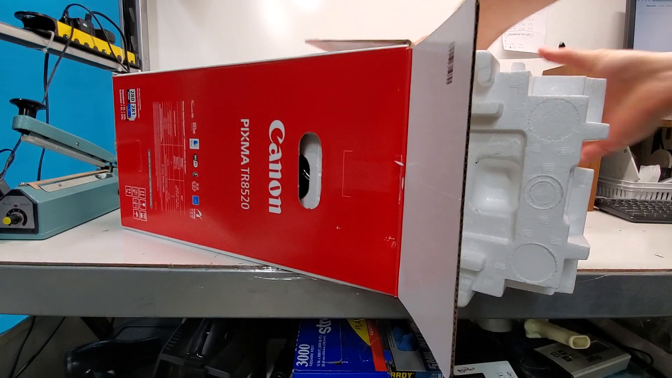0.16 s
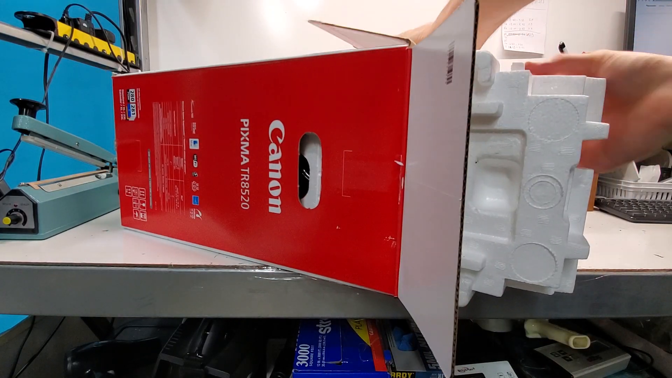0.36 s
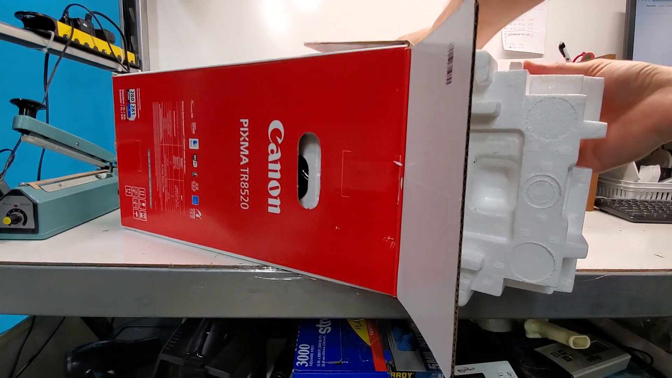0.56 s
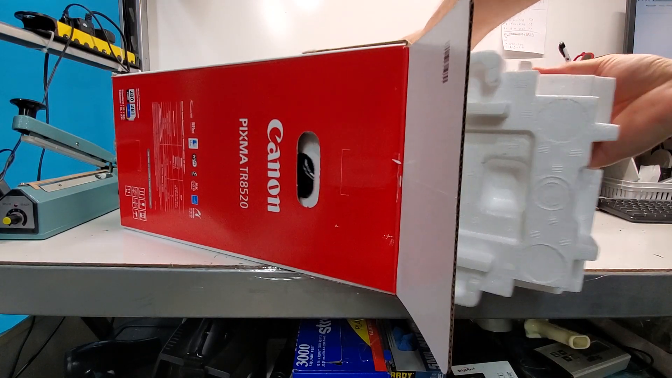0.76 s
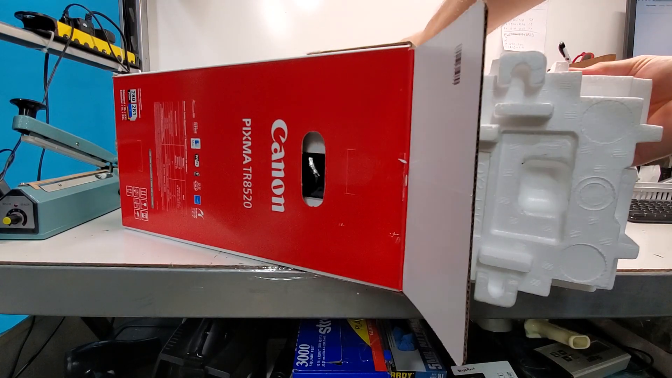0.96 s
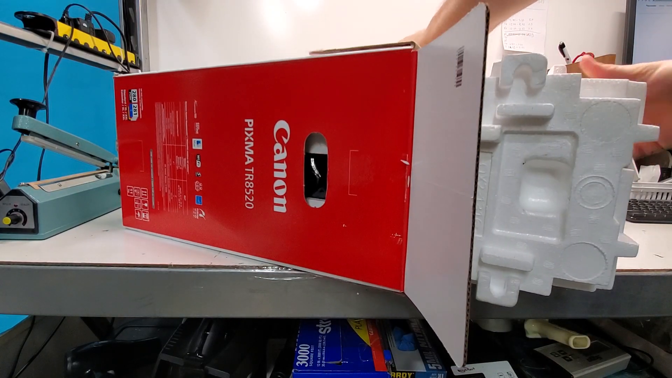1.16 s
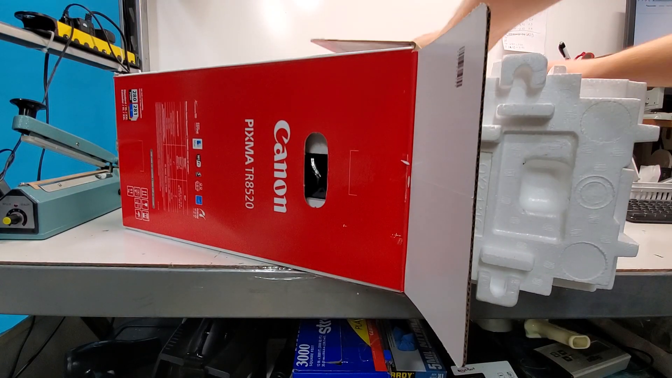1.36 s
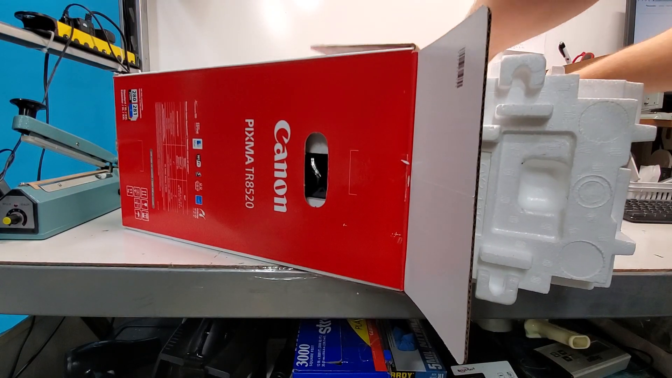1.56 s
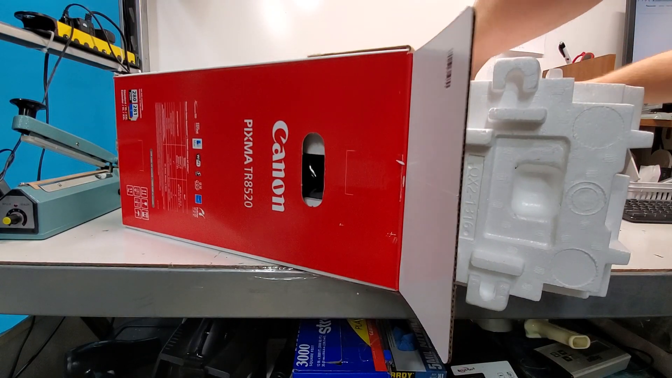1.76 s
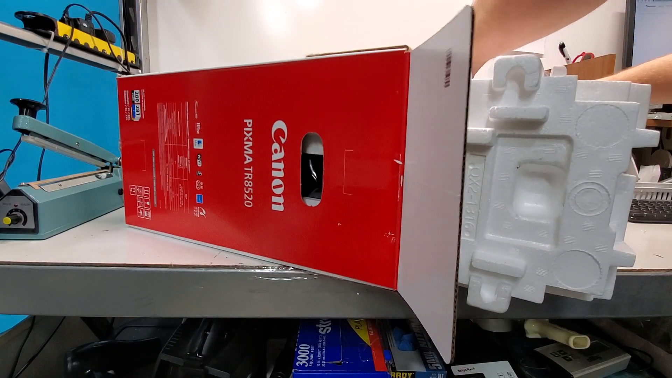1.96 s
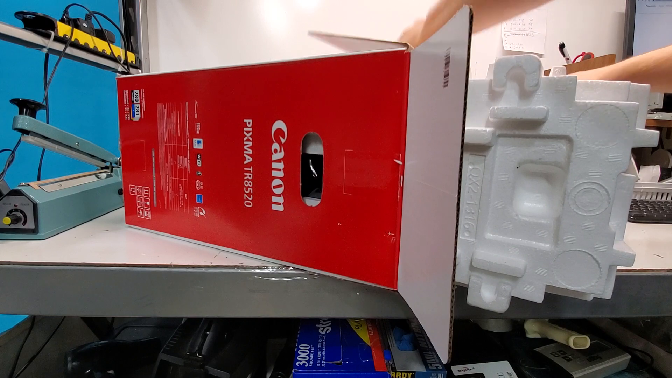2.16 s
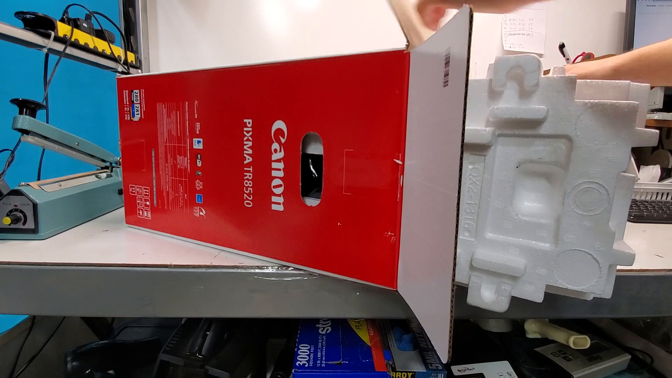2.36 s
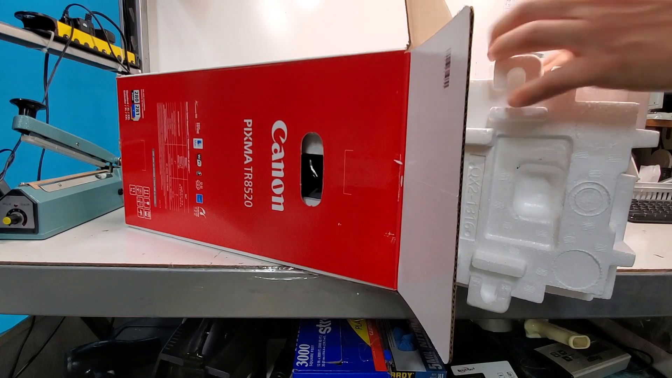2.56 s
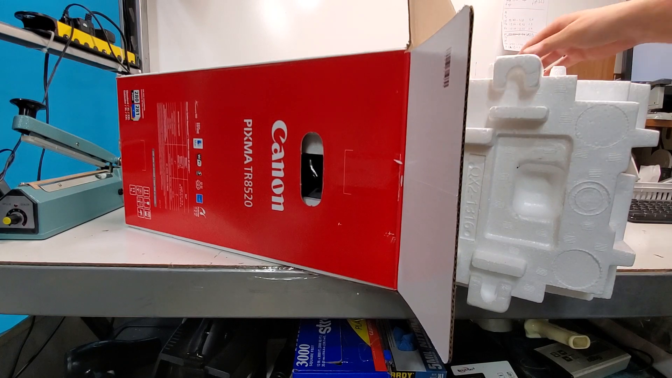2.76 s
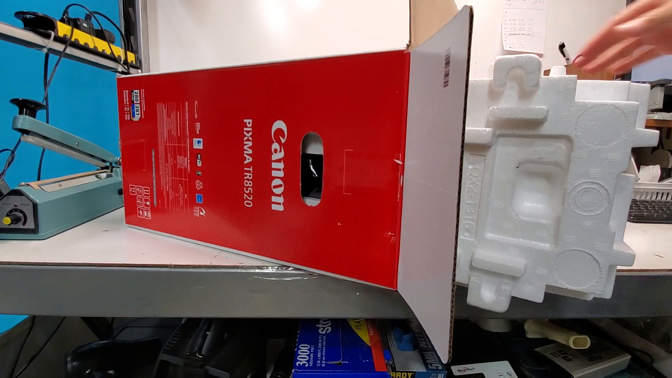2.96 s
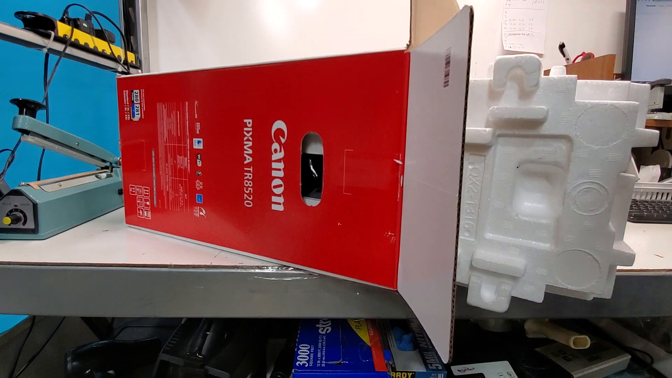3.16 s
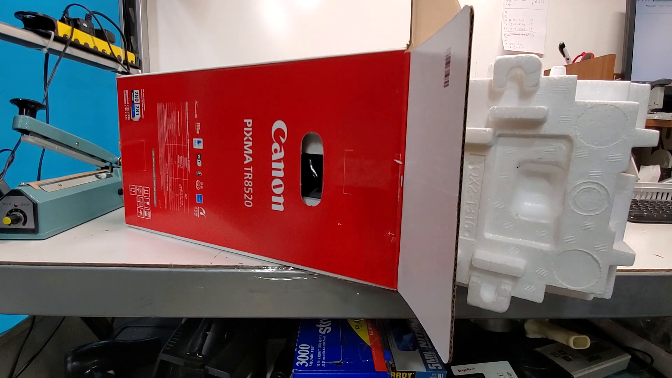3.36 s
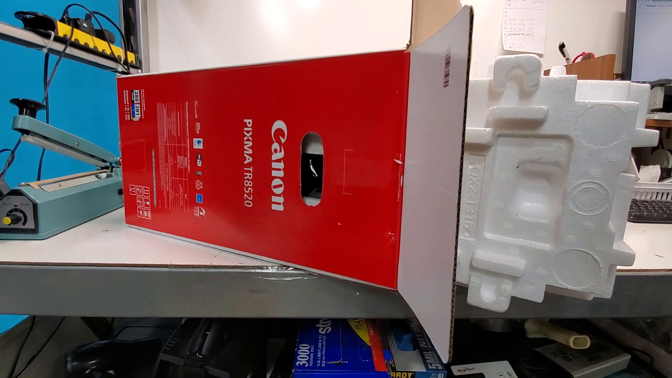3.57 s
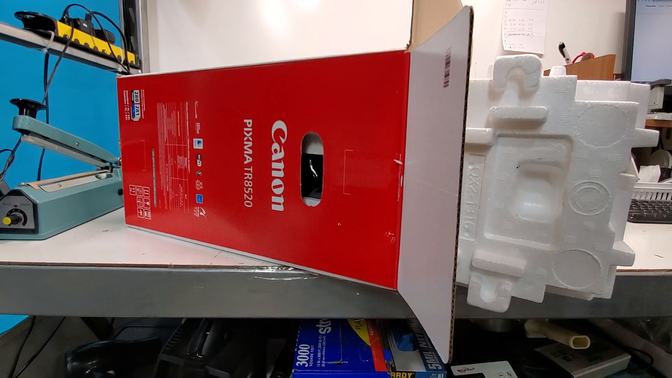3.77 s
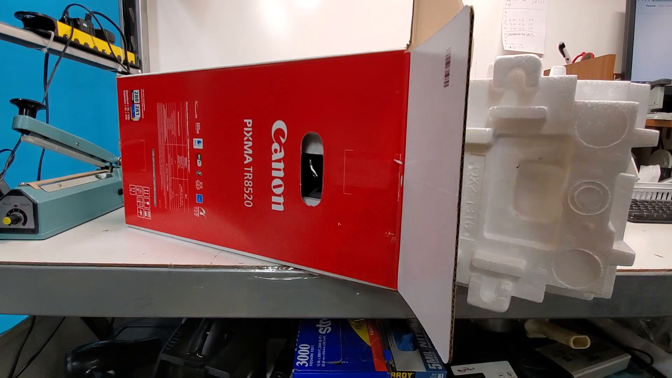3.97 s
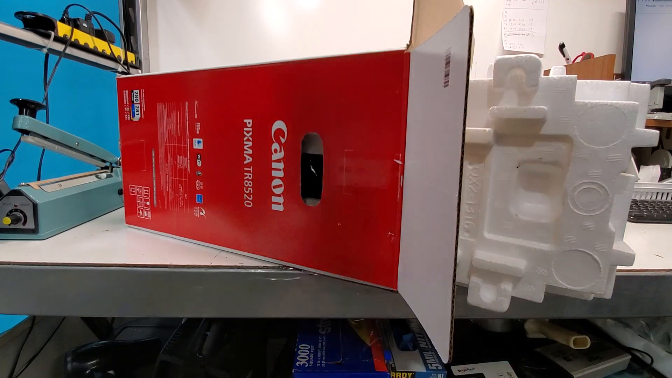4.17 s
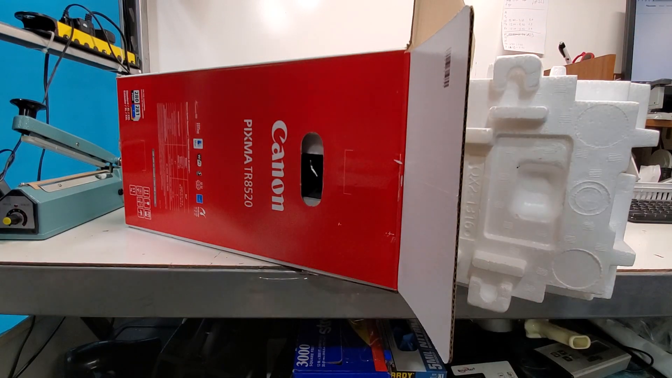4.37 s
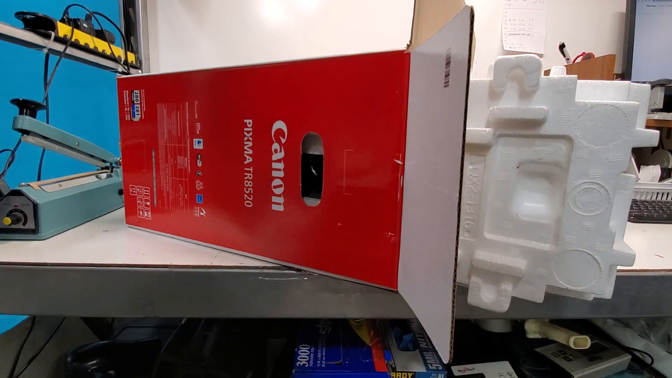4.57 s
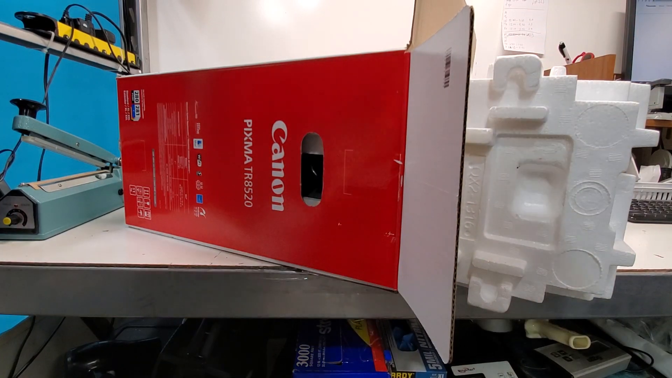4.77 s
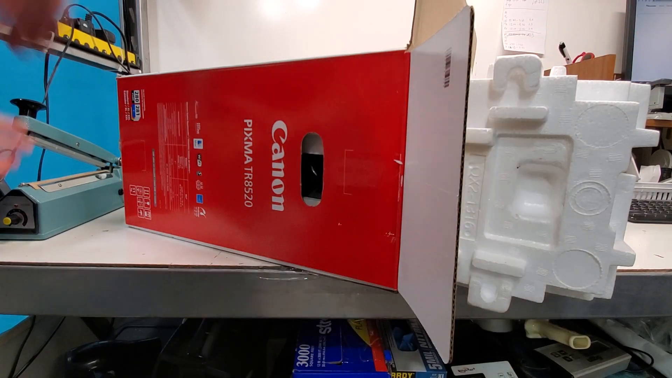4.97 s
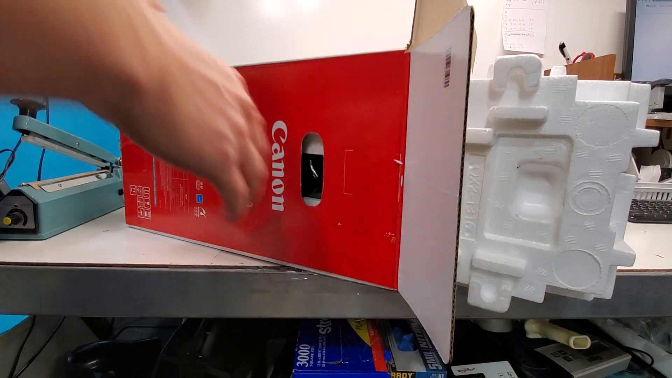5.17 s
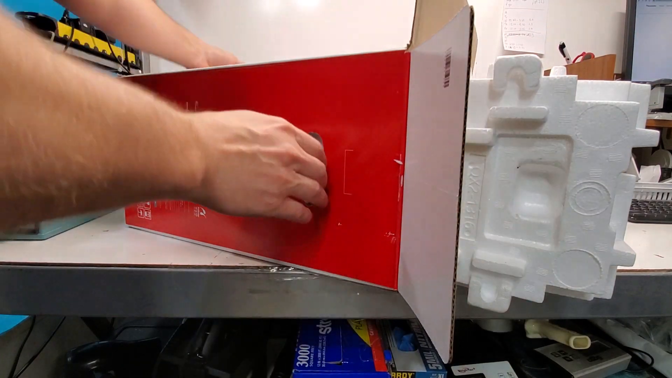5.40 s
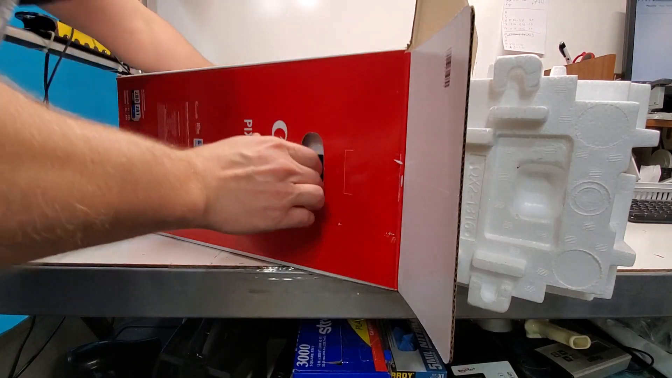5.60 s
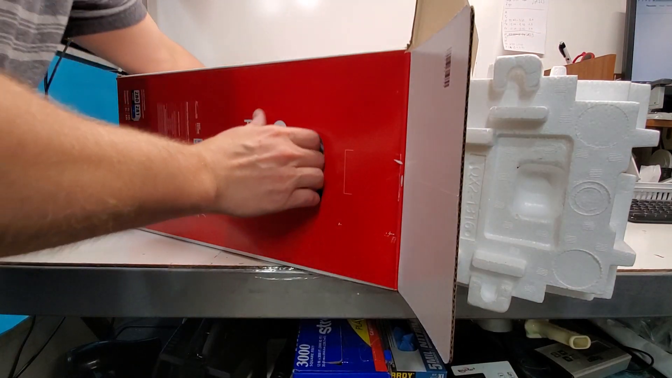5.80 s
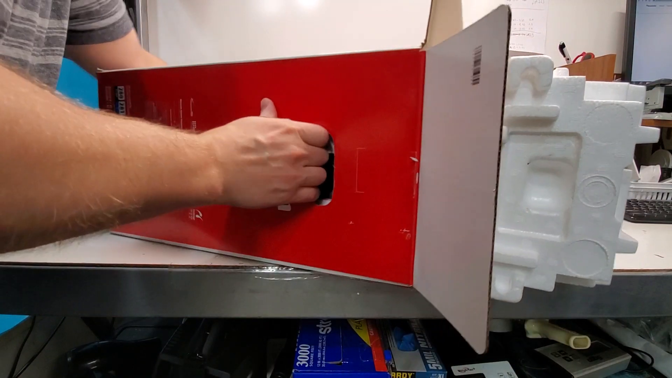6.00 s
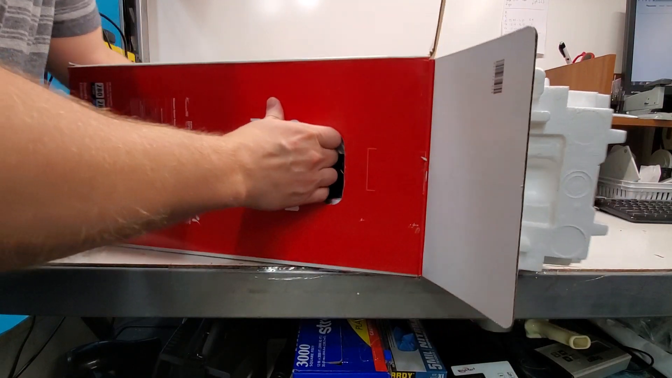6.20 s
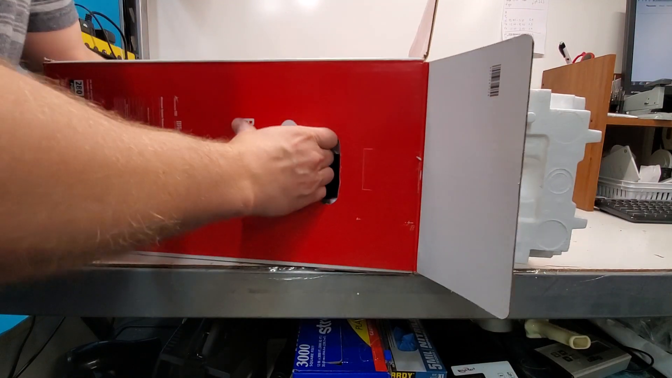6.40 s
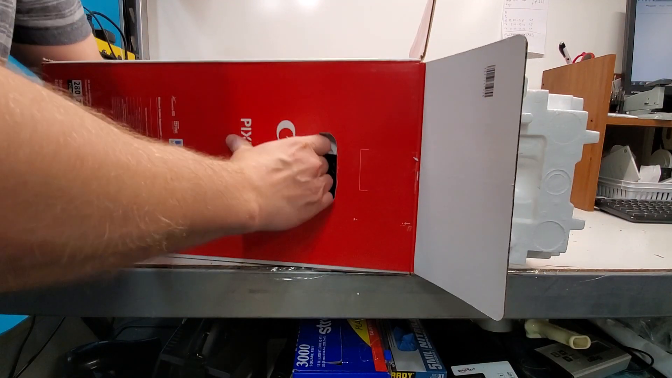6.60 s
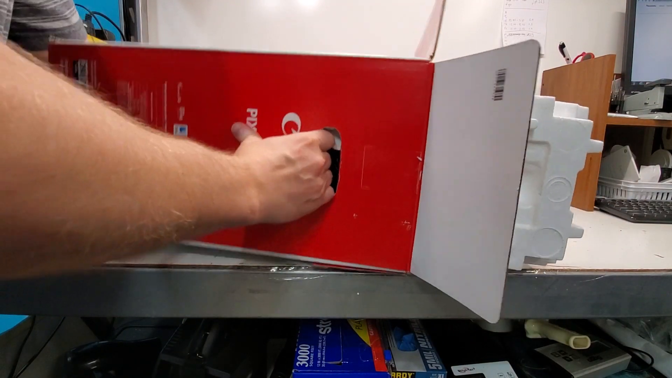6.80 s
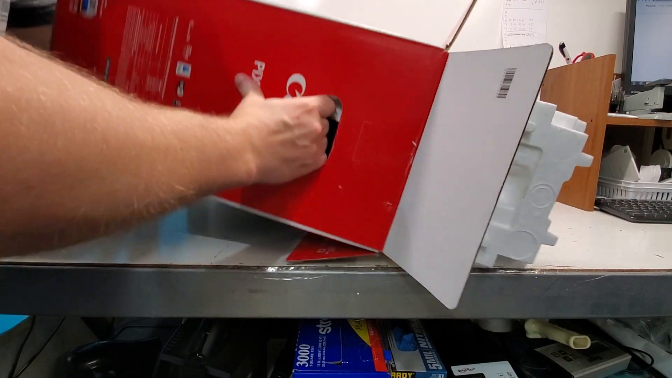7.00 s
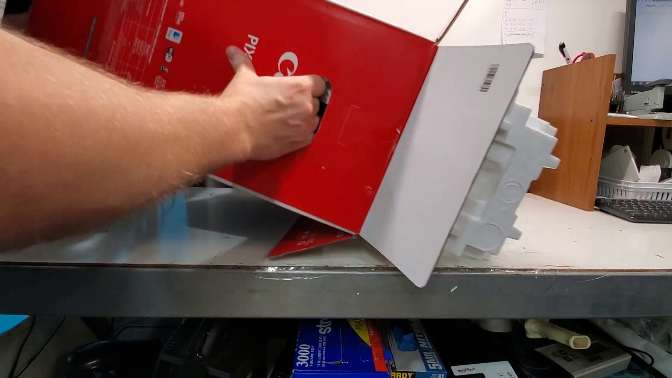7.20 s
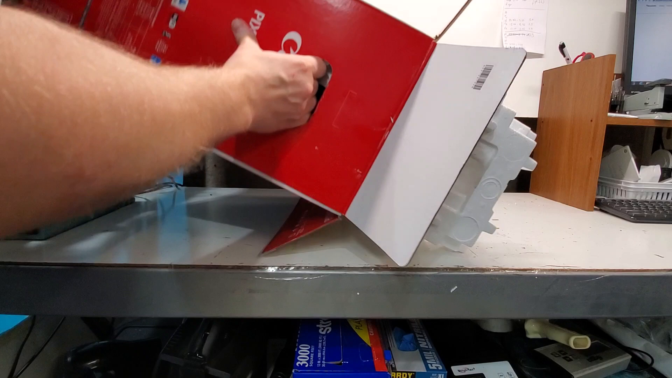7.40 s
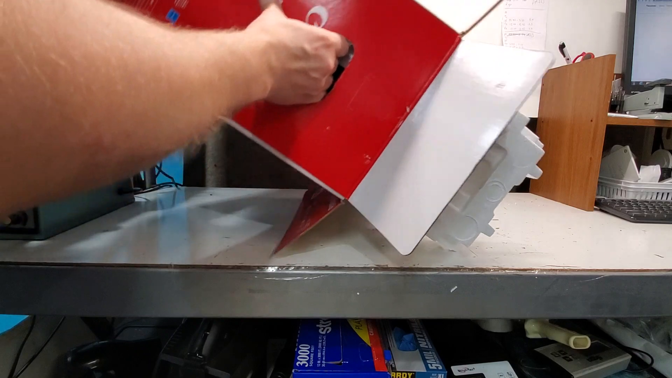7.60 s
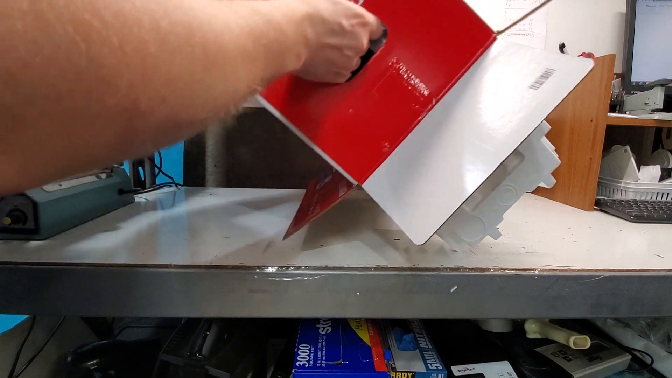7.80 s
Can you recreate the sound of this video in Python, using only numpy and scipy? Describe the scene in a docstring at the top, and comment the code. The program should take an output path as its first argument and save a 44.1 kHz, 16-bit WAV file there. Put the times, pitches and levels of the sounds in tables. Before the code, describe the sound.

Foam packing blocks rub, squeak and crackle against a cardboard carton, pause quietly, then the carton is grabbed, dragged and tipped on a workbench.

```python
"""A workbench in a quiet, humming room: hands tug foam blocks in a cardboard carton, let go, shuffle, then drag and tip it.
Foam beads hiss by stick-slip: clumped random impulses are filtered into foam, fizz, flap, wall and bench layers.
Knocks excite decaying carton modes, scuffs and ticks are filtered noise bursts, squeaks are noise in a narrow
resonance, and thumps are one damped low mode. A short tail and two spaced microphones place them."""
import sys
import numpy as np
from scipy import signal
from scipy.io import wavfile
from scipy.ndimage import uniform_filter1d

SR = 44100
rng = np.random.default_rng(int(sys.argv[2]) if len(sys.argv) > 2 else 0)


def log_audio(samples):
    """Write samples as a 16-bit WAV file to the path given in sys.argv[1]."""
    # one column per channel
    frames = np.atleast_2d(samples).T
    # limit to full scale, then quantise
    limited = np.clip(frames, -1, 1)
    pcm = np.round(limited * 32767).astype(np.int16)
    wavfile.write(sys.argv[1], SR, pcm)


N = 346185  # samples

# vibration modes of the carton: f/Hz, level/dB, t60/s
CARTON_MODES = [(183, -9, 0.18), (248, -5.5, 0.14), (423.7, -3.5, 0.12), (627, 4.5, 0.068),
                (761, 9.5, 0.033), (904, 0, 0.077), (1255, -1, 0.093), (1500, -18.5, 0.036)]


def rubbing():
    """Stick-slip friction: one motion drives the foam, carton walls, flaps and bench top through their own spectra."""
    # spectra of foam, dry-bead fizz, flaps, wall and bench: f/Hz, relative level/dB per Hz
    foam_spectrum = [(1500, -24.5), (2300, -16.5), (2900, -6.5), (3800, -4), (6000, -8.5), (7500, -9.5),
                     (8500, -35)]
    fizz_spectrum = [(7000, -28), (8000, -2), (12000, -3), (16000, -7.5)]
    flap_spectrum = [(1000, -22.5), (1500, -9), (2050, -3), (2400, -8), (3000, -43.5)]
    wall_spectrum = [(150, -26), (300, -6.5), (600, -4), (1000, -0.5), (1600, -6), (1800, -19.5),
                     (2600, -10), (8000, -22.5), (16000, -37.5)]
    bench_spectrum = [(25, -20), (45, -3.5), (75, -0.5), (120, -5), (220, 1), (400, -10.5), (800, -32)]
    # moving resonance of the loaded bench top: t/s, f/Hz
    loaded_pitch = [(0, 97.5), (.9, 132.4), (1.7, 111.5), (5.5, 105.3), (5.9, 82.1), (6.6, 78), (6.86, 106),
                    (7.1, 76.6), (7.85, 91.2)]
    bench_lag_s = 0.012  # the heavy bench top smooths the motion

    foam_db, fizz_db, wall_db, bench_db, flaps_db = motion()
    bench_gain = uniform_filter1d(amp(bench_db), round(bench_lag_s * SR))
    (bench_hz,) = follow(loaded_pitch)

    dense = evened(slips(12000, 0.35, 0.54, 0.027))
    grit = evened(slips(400, 1.1, 2.3, 0.011))  # sparse snaps
    beads = dense + 0.17 * grit
    foam = evened(shifting(colour(beads, foam_spectrum), 2.5))
    fizz = evened(shifting(colour(beads, fizz_spectrum), 1.5))
    flaps = evened(shifting(colour(beads, flap_spectrum), 2.3))

    board = colour(slips(4000, 1.3, 1.0, 0.025), wall_spectrum)
    t = np.arange(4000) / SR
    ring = sum(amp(db - 60 * t / t60) * np.sin(2 * np.pi * hz * t) for hz, db, t60 in CARTON_MODES)
    hollow = signal.oaconvolve(board, ring[None], axes=1)[:, :N]
    wall = evened(shifting(evened(board) + 0.15 * evened(hollow), 3.05))

    jolts = colour(slips(1500, 2.5, 2.4, 0.033), bench_spectrum)
    hum = resonate(jolts, bench_hz, 47.0)
    bench = evened(evened(jolts) + 0.91 * evened(hum))

    beads_mix = amp(foam_db) * foam + amp(fizz_db) * fizz
    board_mix = amp(wall_db) * wall + amp(flaps_db) * flaps
    return beads_mix + board_mix + bench_gain * bench


def motion():
    """Power addition: strokes that swell, hold and fade alike in every layer join the light contact between them."""
    # hand strokes, swell and fade as the time for 20 dB: t/s, swell/s, hold/s, fade/s,
    # then foam, fizz, wall, bench and flap level/dB
    stroke_table = [(0.0, 0.02, 0.025, 0.027, -54, -70, -55.5, -65, -54),
                    (0.044, 0.011, 0.042, 0.081, -38.5, -44.5, -40, -45.5, -42),
                    (0.325, 0.032, 0.069, 0.24, -45, -45, -67, -49, -55),
                    (0.452, 0.056, 0.001, 0.12, -42, -44, -38.5, -61, -44.5),
                    (0.539, 0.002, 0.0012, 0.57, -42.5, -43, -52, -46, -56),
                    (0.813, 0.12, 0.13, 0.053, -26.5, -29.5, -33, -41, -32.5),
                    (0.997, 0.0015, 0.035, 0.045, -45.5, -75, -41, -50, -51),
                    (1.129, 0.057, 0.035, 0.059, -37, -40, -38, -43, -44.5),
                    (1.313, 0.063, 0.27, 0.043, -55.5, -56, -57, -69, -62),
                    (1.531, 0.06, 0.001, 0.098, -44.5, -47.5, -68, -59, -57),
                    (1.641, 0.003, 0.08, 0.087, -62, -49, -39, -43.5, -50),
                    (1.783, 0.23, 0.052, 0.061, -28, -38, -40.5, -47, -33.5),
                    (1.909, 0.15, 0.047, 0.07, -36.5, -44.5, -37.5, -43, -40.5),
                    (2.05, 0.004, 0.026, 0.34, -54, -71, -44.5, -49, -56),
                    (2.146, 0.078, 0.00091, 0.15, -37, -43, -41, -44.5, -43.5),
                    (2.352, 0.031, 0.0085, 0.054, -48.5, -54, -53, -74, -49.5),
                    (2.558, 0.003, 0.047, 0.12, -50.5, -55, -60, -51.5, -53.5),
                    (2.656, 0.018, 0.013, 0.052, -47, -46, -56.5, -55, -53),
                    (3.304, 0.0054, 0.11, 0.13, -99, -97, -69.5, -64, -100),
                    (3.524, 0.02, 0.03, 0.045, -61.5, -74, -75, -78, -60),
                    (3.753, 0.0053, 0.001, 0.32, -55.5, -64, -57.5, -60, -59.5),
                    (3.9, 0.0028, 0.001, 0.13, -62, -78, -49, -55, -51.5),
                    (4.33, 0.078, 0.001, 0.084, -56, -64, -58, -71, -53.5),
                    (4.697, 0.021, 0.02, 0.076, -57.5, -86, -49, -54, -59.5),
                    (4.854, 0.091, 0.00085, 0.08, -55, -65, -62, -60, -58),
                    (5.397, 0.26, 0.001, 0.058, -58, -68, -63, -78, -57),
                    (5.415, 0.004, 0.001, 0.2, -65, -76, -50, -58, -62),
                    (5.582, 0.01, 0.012, 0.046, -52, -56, -45, -48, -75),
                    (5.641, 0.04, 0.041, 0.053, -57, -55.5, -47, -49, -71),
                    (5.708, 0.0046, 0.001, 0.092, -50, -57, -40, -45.5, -52),
                    (5.768, 0.002, 0.001, 0.04, -51, -53, -39.5, -38, -61),
                    (5.805, 0.016, 0.032, 0.083, -47, -51, -42, -51, -50),
                    (5.892, 0.075, 0.063, 0.05, -45, -49, -42, -42, -54),
                    (5.956, 0.04, 0.0037, 0.025, -61, -58, -34.5, -48, -41.5),
                    (5.983, 0.05, 0.48, 0.11, -55.5, -58.5, -50.5, -54.5, -57),
                    (6.487, 0.005, 0.18, 0.085, -51.5, -56, -54.5, -52, -57.5),
                    (6.836, 0.019, 0.15, 0.14, -58, -72, -38.5, -39.5, -49.5),
                    (6.946, 0.17, 0.2, 0.11, -37.5, -41.5, -39.5, -43, -43),
                    (7.289, 0.15, 0.05, 0.12, -40, -43, -63, -77, -59),
                    (7.367, 0.049, 0.046, 0.11, -35, -40.5, -67, -73, -52),
                    (7.834, 0.03, 0.02, 0.087, -56, -57, -39.5, -44.5, -46.5)]
    # light contact between strokes: t/s, foam, fizz, wall, bench and flap level/dB
    contact_table = [(0, -75, -89, -66, -53, -65), (0.299, -65, -65, -57, -60, -66),
                     (1.249, -69, -83, -58, -57.5, -72), (2.4, -67, -90, -77, -62, -77),
                     (2.841, -87, -92.5, -82, -67.5, -92), (3.29, -88, -91, -88, -63, -86),
                     (3.735, -68, -74, -76.5, -66.5, -83), (4.14, -69.5, -78, -80.5, -60.5, -89.5),
                     (4.48, -84, -87.5, -88, -63.5, -101), (4.64, -85.5, -98, -80.5, -64, -91),
                     (4.94, -84.5, -75.5, -80, -62.5, -87), (5.1, -73.5, -73, -79, -61.5, -91),
                     (5.554, -92.5, -74, -54, -72, -90), (6.8, -61, -68, -53.5, -51, -77),
                     (7.5, -47, -50.5, -49.5, -54, -54.5), (7.64, -73, -77, -62, -55, -71),
                     (7.85, -66, -84, -57, -54, -68)]
    t = np.arange(0, N / SR, .001)
    every = np.arange(N) / SR
    s, swell, hold, fade, *layers = np.transpose(stroke_table)[:, :, None]
    before, after = np.maximum(s - t, 0), np.maximum(t - s - hold, 0)
    shape_db = -20 * (before / swell + after / fade)
    levels = []
    for db, light in zip(layers, follow(contact_table)):
        stroke_power = (amp(db + shape_db) ** 2).sum(0)
        power = np.interp(every, t, stroke_power) + amp(light) ** 2
        levels.append(10 * np.log10(power))
    return levels


def slips(per_s, spread_db, clump_db, clump_s):
    """Stick-slip as a random point process: releases of uneven size in clumps, as direct and scattered streams."""
    width = round(clump_s * SR)
    clumps = evened(uniform_filter1d(uniform_filter1d(rng.standard_normal(N), width), width))
    size = amp(spread_db * np.minimum(rng.exponential(1, (2, N)), 4) + clump_db * clumps)
    return size * rng.standard_normal((2, N)) * (rng.random((2, N)) < per_s / SR)


def shifting(x, depth_db):
    """Varying contact: the touching patch wanders, so narrow resonances of foam and board come and go."""
    hz, t, z = signal.stft(x, SR, nperseg=1024, noverlap=768)
    patches = uniform_filter1d(rng.standard_normal((len(t), len(hz))), size=9, axis=0)
    patches = uniform_filter1d(patches, size=2, axis=1)
    return signal.istft(z * amp(depth_db * evened(patches).T), SR, nperseg=1024, noverlap=768)[1][:, :N]


def squeaks():
    """Narrow-band resonance: noise in a wavering band swells and fades as a faint airy squeak of foam."""
    # foam squeaks: t/s, length/s, f/Hz, width/Hz, level/dB
    squeak_table = [(0.711, 0.13, 990, 147, -38.5), (1.922, 0.05, 1004, 180, -37),
                    (3.313, 0.086, 1080, 180, -58.5), (3.512, 0.038, 1340, 600, -55),
                    (3.65, 0.12, 2190, 180, -77), (3.982, 0.34, 1870, 300, -69.5),
                    (4.01, 0.32, 3300, 200, -82), (7.705, 0.072, 2030, 182, -68)]
    out = np.zeros((2, N))
    for s, length, hz, width_hz, db in squeak_table:
        size = round(length * SR)
        waver = evened(uniform_filter1d(rng.standard_normal(16000), size=2500))
        waver_hz = hz * (1 + 0.025 * waver)
        once = resonate(rng.standard_normal((2, 16000)), waver_hz, width_hz)
        air = resonate(once, waver_hz, width_hz)
        add(out, s, amp(db) * evened(air)[:, :size] * signal.windows.tukey(size, .6))
    return out


def knocks():
    """Modal excitation: a brief push rings the carton modes, detuned by the grip, and rattles the flaps."""
    # blows on the carton: t/s, level/dB, f/Hz favoured by the hardness of the blow, factor on the t60
    knock_table = [(0.156, -44.5, 388, 0.64), (0.312, -30, 350, 0.14), (0.341, -36, 350, 0.26),
                   (0.557, -41.5, 430, 0.7), (0.9, -25, 300, .15), (1.018, -33.5, 870, 0.22),
                   (1.627, -30.5, 290, 0.17), (1.646, -20, 530, 0.24), (1.6556, -24, 257, 0.45),
                   (2.246, -48, 600, 1), (3.309, -45, 950, 1.24), (3.756, -58, 1100, 0.65),
                   (3.9, -38.5, 690, 0.96), (3.983, -44, 990, 0.091), (4.694, -50, 1160, 0.53),
                   (5.4109, -27.5, 680, 0.55), (5.415, -31, 340, 1.02), (5.5215, -36.5, 810, 0.18),
                   (5.768, -39, 544, 0.65), (5.952, -28.5, 1000, 0.36), (6.495, -35, 754, 1.06),
                   (6.83, -32.5, 880, 0.29), (6.919, -28, 362, 0.4), (7.019, -30.5, 580, 0.87),
                   (7.049, -30, 670, 0.54), (7.109, -29, 600, 0.93), (7.13, -26.5, 406, 0.26),
                   (7.153, -25.5, 500, 0.33), (7.281, -40, 560, .3), (7.472, -40, 750, 0.26)]
    out, t = np.zeros((2, N)), np.arange(8000) / SR
    draws = rng.uniform(-0.89, 1, (len(knock_table), 3, len(CARTON_MODES)))
    for (s, db, corner_hz, damping), draw in zip(knock_table, draws):
        ring = 0
        for (hz, level, t60), a, b, c in zip(CARTON_MODES, *draw):
            decay = amp(level + 3.0 * a - 60 * t / (t60 * damping))
            ratio = hz / corner_hz
            favour = ratio / (1 + ratio ** 4)
            ring = ring + decay * favour * np.sin(2 * np.pi * hz * (1 + 0.071 * b) * t + 2.26 * c)
        ring *= 1 - np.exp(-t * corner_hz / 0.66)  # a soft blow builds up over about a cycle
        # the wall gives way and springs back
        phase = t * corner_hz * 11.0
        push = phase ** 2 * np.exp(-phase) * (1 - t * corner_hz * 2.0)
        noise = rng.standard_normal((2, len(t)))
        rattle = evened(band_noise(noise, 4, corner_hz / 2.9, corner_hz * 1.36))
        rattle = rattle * amp(-60 * t / (.16 * damping)) * np.minimum(t / 0.0066, 1)
        add(out, s, amp(db) * (ring / abs(ring).max() - 1.5 * push + 0.45 * rattle))
    return out


def scuffs():
    """Source and filter: noise bursts of foam and tape are tinted by the block's resonances and a sagging note."""
    # short scuffs: t/s, level before halving/dB, f/Hz, t60/s
    scuff_table = [(0.321, -40, 14000, .03), (0.551, -27, 6100, 0.07), (2.051, -42, 2610, 0.047),
                   (2.452, -36, 3350, 0.094), (2.5512, -32.5, 14900, 0.09), (2.546, -36, 4340, 0.11),
                   (3.7524, -45, 4500, 0.037), (5.5888, -30, 3100, 0.03), (5.711, -30, 3060, 0.037),
                   (5.7101, -22, 1250, 0.028), (5.586, -34, 1270, 0.054), (6.267, -36.5, 8100, 0.13),
                   (6.4026, -36, 3420, 0.065), (6.492, -38, 4320, 0.065), (6.65, -40.5, 6200, 0.12),
                   (6.7242, -33.5, 3680, 0.11), (7.828, -40, 3900, 0.032)]
    # resonances of the foam block: f/Hz, width/Hz, level/dB
    block_modes = [(1290, 360, -13), (3230, 600, 3), (4730, 390, 18), (6960, 1700, 14)]
    sag, sag_s, note_width = .2, .005, .1  # initial rise as a share of pitch, time constant, width as a share
    out, t = np.zeros((2, N)), np.arange(5000) / SR
    for s, db, hz, t60 in scuff_table:
        burst = rng.standard_normal((2, len(t)))
        band = band_noise(burst, 1, hz / 1.14, min(hz * 1.12, 20000))
        note = resonate(burst, hz * (1 + sag * np.exp(-t / sag_s)), note_width * hz)
        block = sum(amp(level) * resonate(burst, np.full(len(t), f), width) for f, width, level in block_modes)
        tinted = evened(evened(band) + 0.58 * evened(block) + 0.32 * evened(note))
        add(out, s, amp(db - 60 * t / t60) * tinted * np.minimum(t / 0.00066, 1) / 2)
    return out


def ticks():
    """Impulsive release: a crisp, very broad crack of a single foam bead or tape decays at once."""
    # snaps: t/s, level/dB, centre f/Hz
    tick_table = [(0.016, -42, 9000), (0.2264, -43, 1790), (0.7065, -24, 4800), (0.7433, -24.5, 4800),
                  (0.9635, -45, 4600), (1.005, -34, 4900), (1.0345, -27.5, 5250), (1.132, -26, 11000),
                  (2.4522, -44, 8000), (3.648, -50, 9000), (3.9833, -42.5, 3300), (4.0862, -51, 9100),
                  (5.713, -49, 6500), (5.7692, -39, 1300), (5.845, -30.5, 11000), (5.902, -22.5, 7000)]
    t60_s = 0.014
    out, t = np.zeros((2, N)), np.arange(900) / SR
    for s, db, hz in tick_table:
        crack = band_noise(rng.standard_normal((2, len(t))), 1, hz / 1.9, min(hz * 1.9, 20000))
        add(out, s, amp(db - 60 * t / t60_s) * evened(crack) * np.minimum(t / 0.00056, 1))
    return out


def thumps():
    """Damped oscillator: the shifting load softly pushes one low mode of the bench top."""
    # dull thumps: t/s, level/dB, f/Hz, t60/s
    thump_table = [(1.119, -36, 110, 0.079), (5.631, -26, 125, .05), (5.772, -36.5, 80, 0.3),
                   (6.233, -31, 100, .06), (6.525, -37, 70, .2), (6.582, -29, 83, 0.081),
                   (6.839, -24, 114, 0.15)]
    rise_s = 0.0095
    out, t = np.zeros((2, N)), np.arange(8000) / SR
    for s, db, hz, t60 in thump_table:
        envelope = amp(db - 60 * t / t60) * (1 - np.exp(-t / rise_s))
        add(out, s, envelope * np.sin(2 * np.pi * hz * t)[None])
    return out


def room():
    """Stationary background: coloured air noise, lumpy in the bass, plus steady sinusoids of mains hum."""
    # spectrum of the room air: f/Hz, relative level/dB per Hz
    air_spectrum = [(15, -29.5), (30, -19), (52, 10), (85, -21), (120, -18.5), (240, -9), (330, -13),
                    (500, -21.5), (1400, -37), (3500, -32.5), (6000, -25), (16000, -45.5)]
    # mains hum: f/Hz, rms level/dB
    hum_table = [(120, -65), (240, -72.5)]
    t = np.arange(N) / SR
    air = amp(-67.5) * evened(colour(rng.standard_normal((2, N)), air_spectrum))
    hum = sum(np.sqrt(2) * amp(db) * np.sin(2 * np.pi * (hz * t + rng.random())) for hz, db in hum_table)
    return air + hum * [[1], [0]]  # the hum is in the direct stream only


def walls(x):
    """Diffuse reflection: a short workshop tail of sparse taps of random sign, other ones for each channel."""
    t = np.arange(12000) / SR
    sign = rng.choice([-1., 1.], (2, len(t)))
    present = rng.random((2, len(t))) < 2500 / SR  # taps per second
    taps = sign * present * amp(-60 * t / 0.076) * (t > .004)
    return signal.oaconvolve(x, taps / np.linalg.norm(taps[0]), axes=1)[:, :N]


def ports(streams):
    """Interchannel coherence: of two spaced microphones, the left blends the delayed direct and scattered streams."""
    # place of the sound: t/s, left over right level/dB, left lag/samples
    place_table = [(0, -1, 8.5), (2.2, -0.5, 3), (2.801, -1.5, 13.5), (3.599, 1, 4.5), (4.2, 2, 2.5),
                   (4.6, 2.5, -3.5), (5.3, 2, -9), (5.5, 1.5, 5), (7.85, -0.2, 10)]
    # left-right likeness: f/Hz, coherence/1
    likeness = [(60, 0.95), (250, 0.96), (600, 0.67), (1400, 0.43), (3000, 0.22), (15000, 0.1406)]
    hz, t, (direct, scattered) = signal.stft(streams, SR, nperseg=256, noverlap=192)
    s, pan_db, lag = np.transpose(place_table)
    same = np.clip(read(likeness, hz), 0, 1)[:, None]
    late = np.exp(-2j * np.pi * hz[:, None] * np.interp(t, s, lag) / SR)
    left = same * late * direct + np.sqrt(1 - same ** 2) * scattered
    tilt = amp(np.interp(t, s, pan_db) / 2)
    return signal.istft(np.array([left * tilt, direct / tilt]), SR, nperseg=256, noverlap=192)[1][:, :N]


def amp(db):
    """Decibel law: level to amplitude ratio."""
    return 10 ** (np.asarray(db) / 20)


def evened(x):
    """Normalisation to unit rms."""
    return x / np.sqrt(np.mean(x ** 2) + 1e-20)


def read(points, hz):
    """Interpolation of a curve along a logarithmic frequency axis."""
    f, value = np.transpose(points)
    return np.interp(np.log(hz + 1), np.log(f + 1), value)


def follow(rows):
    """Linear interpolation in time, one value a sample for each column."""
    s, *columns = np.transpose(rows)
    return [np.interp(np.arange(N) / SR, np.maximum.accumulate(s), c) for c in columns]


def add(mix, s, sound):
    """Superposition of a sound onto the mix from time s, cut at the end."""
    part = mix[..., round(s * SR):][..., :sound.shape[-1]]
    part += sound[..., :part.shape[-1]]


def band_noise(x, order, low_hz, high_hz):
    """Band-pass filtering of a noise burst by a Butterworth response."""
    return signal.sosfilt(signal.butter(order, [low_hz, high_hz], "band", fs=SR, output="sos"), x)


def colour(x, points):
    """Minimum-phase filtering: the phase is the Hilbert partner of the log gain."""
    log_gain = np.log(amp(read(points, abs(np.fft.fftfreq(8192, 1 / SR)))))
    taps = np.fft.ifft(np.exp(np.conj(signal.hilbert(log_gain)))).real[:4096]
    return signal.oaconvolve(x, taps[None], axes=1)[:, :N]


def resonate(x, hz, width_hz):
    """Heterodyne resonance: shifts the curve hz to zero, smooths and shifts back, so the pitch can move."""
    turn = np.exp(2j * np.pi * np.cumsum(hz) / SR)
    r = np.exp(-np.pi * width_hz / SR)
    return 2 * (turn * signal.lfilter([1 - r], [1, -r], x / turn)).real


def scene():
    """Superposition: all sources reach the microphones; knocks, scuffs and ticks also excite the tail."""
    hits = knocks() + scuffs()
    snaps = ticks()
    reflected = walls(hits + amp(-6) * snaps)
    tail = signal.sosfilt(signal.butter(2, 300, "high", fs=SR, output="sos"), reflected)
    near = rubbing() + squeaks() + thumps() + hits + snaps
    return ports(near + room()) + amp(-3.5) * tail


def record(dry):
    """Linear filtering: microphone colour with a dip in the treble, then a low-pass band limit."""
    # microphone response: f/Hz, gain/dB
    mic_response = [(5000, 0.5), (6600, 1), (7800, -8), (9000, -1.5), (11000, 1), (13500, 3.5), (16000, 2)]
    edge_hz = 16050
    low_pass = signal.firwin(511, edge_hz, window=("kaiser", 9), fs=SR)
    return signal.oaconvolve(colour(dry, mic_response), low_pass[None], "same")


dry = scene()
out = record(dry)
log_audio(out)
```